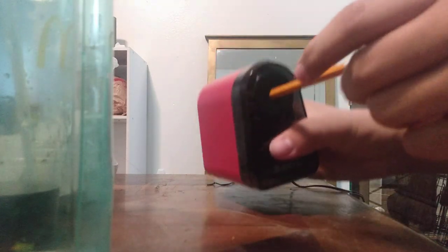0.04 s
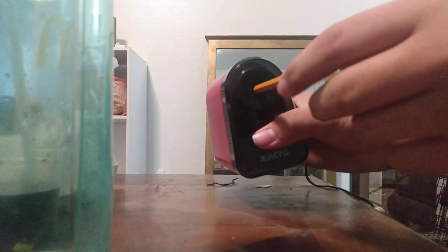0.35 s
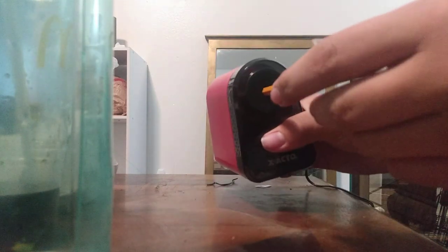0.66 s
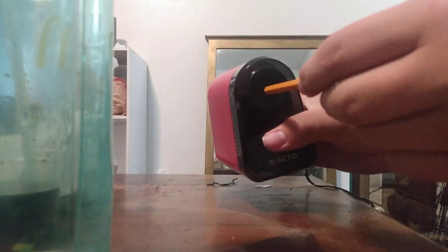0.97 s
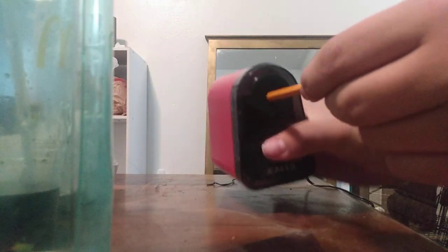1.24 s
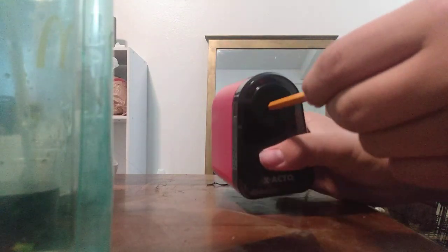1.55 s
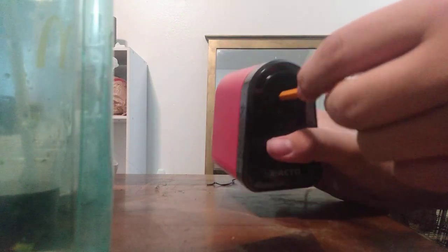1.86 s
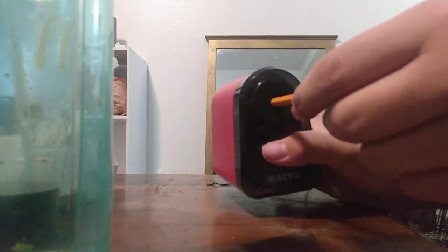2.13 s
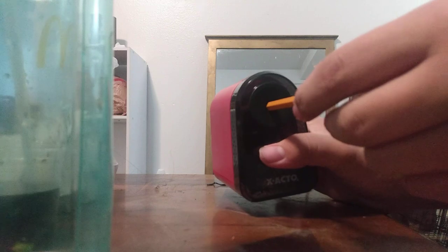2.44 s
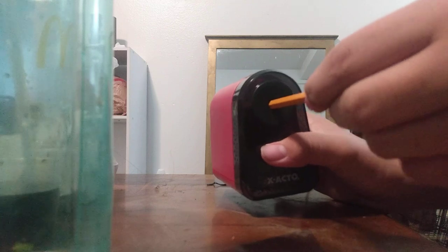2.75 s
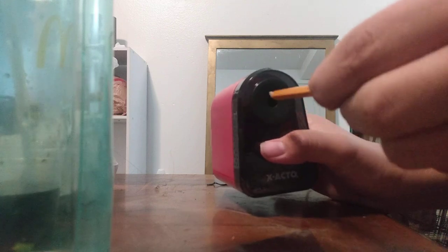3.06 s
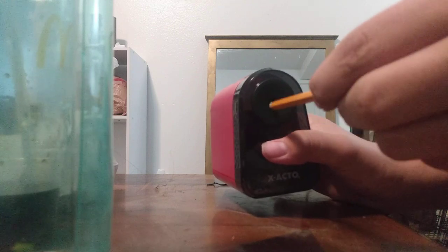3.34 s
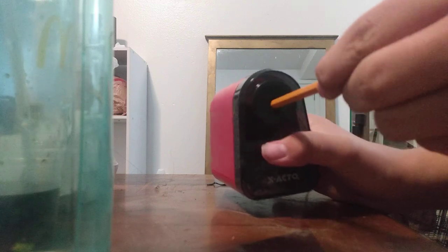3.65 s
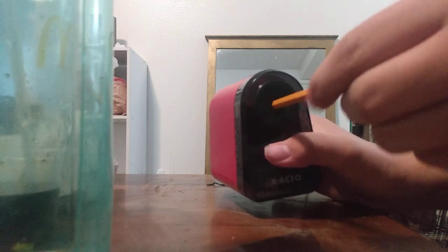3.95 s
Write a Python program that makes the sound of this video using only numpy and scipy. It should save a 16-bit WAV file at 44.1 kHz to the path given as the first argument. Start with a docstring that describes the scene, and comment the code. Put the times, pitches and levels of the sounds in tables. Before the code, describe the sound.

An electric pencil sharpener grinds a pencil, winds down, then restarts with a click.

```python
"""Gears whine and rattle in a plastic housing while a cutter rasps wood: a hand-held electric pencil
sharpener, held above a wooden table in a small room, close to a stereo pair and a little to the left.
The pencil is eased out and the motor coasts to a stop, its unloaded gears clattering. The switch
clicks and the motor spins up again. A low rumble lies under it all."""
import sys
import numpy as np
from scipy import signal
from scipy.fft import rfft, irfft
from scipy.io import wavfile
from scipy.ndimage import uniform_filter1d

SR = 44100
rng = np.random.default_rng(int(sys.argv[2]) if len(sys.argv) > 2 else 0)


def pcm_store(signal):
    """Save signal as 16-bit PCM."""
    levels = np.round(np.clip(np.atleast_2d(signal), -1, 1) * 32767)
    wavfile.write(sys.argv[1], SR, levels.astype(np.int16).T)


N = 176400
T = np.arange(N) / SR
HZ = np.fft.rfftfreq(N, 1 / SR)
RUN_HZ = 282.6  # gear teeth meeting per second at full speed
# resonances of the plastic housing: f/Hz, level/dB
HOUSING = [(150, -36), (340, -30), (380, -31), (430, -14.5), (510, -21.5), (620, -21), (700, -6.5),
           (790, -7.5), (900, -8), (980, 0), (1100, -3), (1240, -5), (1330, -10), (1560, -4), (1700, -14.5),
           (1850, -25.5), (2200, -19.5), (3200, -33), (16000, -51.5)]


def amp(db):
    """Decibels to gain."""
    return 10 ** (np.asarray(db) / 20)


def unit(x):
    """Scales to rms 1."""
    return x / np.sqrt(np.mean(x ** 2) + 1e-20)


def curve(points):
    """A table of (t/s, value) at every sample."""
    return np.interp(T, *np.transpose(points))


def read(points, hz):
    """A table of (f/Hz, value) on a log-frequency axis."""
    f, value = np.transpose(points)
    return np.interp(np.log(hz + 1), np.log(f + 1), value)


def drift(hz):
    """Random motion up to about the given rate, rms 1."""
    return unit(irfft(rfft(rng.standard_normal(N)) / (1 + (HZ / hz) ** 4) * (HZ > 0), N))


def colour(x, db):
    """Minimum-phase filter shaped by a level at every frequency, its peak at 0 dB."""
    log_gain = np.log(amp(np.maximum(db - np.max(db), -100)))
    cepstrum = irfft(log_gain, N)[:N // 2]
    cepstrum[1:] *= 2
    taps = irfft(np.exp(rfft(cepstrum, N)), N)[:4096]
    return signal.oaconvolve(x, taps[None], axes=1)[:, :N]


def steadied(x, samples):
    """Evens out the power over a span of samples."""
    return x / np.sqrt(abs(uniform_filter1d((x ** 2).mean(0), size=samples)) + 1e-20)


def panned(db):
    """Left and right gains for a level difference."""
    return amp(np.array([[db], [-db]]) / 2)


def echoes(x, decay):
    """The diffuse tail of x, dying away by a table of (f/Hz, t60/s)."""
    hz, t, spectra = signal.stft(rng.standard_normal((2, SR // 2)), SR, nperseg=256)
    tail = signal.istft(spectra * amp(-60 * t / read(decay, hz)[:, None]), SR, nperseg=256)[1]
    return signal.fftconvolve(x, tail / np.linalg.norm(tail[0]), axes=1)[:, :N]


def noise_pair():
    """White noise at the two microphones: most alike in the low mids, nearer the left one."""
    # likeness of the two channels: f/Hz, coherence
    likeness = [(20, 0.34), (200, 1), (600, 1), (1100, 0.72), (2000, 0.66), (3500, 0.63), (8000, 0.31),
                (16000, 0.12)]
    # balance across the pair: f/Hz, left over right/dB
    balance = [(20, 0), (70, -.5), (150, 3), (600, 2.5), (850, 2), (1100, 5), (1400, 3.5), (1650, 4.5),
               (2000, -2.5), (2600, -1.5), (3300, -1), (4500, 2), (8000, 1), (16000, 1.5)]
    left_lead_s = .00004
    left, other = rfft(rng.standard_normal((2, N)))
    same, lean = read(likeness, HZ), amp(read(balance, HZ) / 2)
    right = (same * left + np.sqrt(1 - same ** 2) * other) * np.exp(-2j * np.pi * HZ * left_lead_s)
    return irfft(np.array([left * lean, right / lean]), N)


def bursts(teeth, spread_db, decay_s, jitter, bed):
    """One burst of noise for each tooth, scattered in strength and timing, over a steady bed."""
    count = np.maximum.accumulate(np.floor(teeth + jitter * drift(RUN_HZ / 2)))
    hit = np.diff(count, prepend=0) > 0
    strength = amp(spread_db * np.clip(rng.standard_normal(N), -2, 2))
    power = signal.lfilter([1], [1, -np.exp(-2 / (decay_s * SR))], hit * strength ** 2)
    return noise_pair() * np.sqrt(power / power.mean() + bed)


def rumble():
    """Room tone: a low, steady rumble."""
    # spectrum of the room tone: f/Hz, level/dB
    spectrum = [(20, -26.5), (40, -22), (55, -22), (70, 7), (90, 1), (130, 2), (170, -3), (230, -1),
                (320, -17), (500, -30), (1000, -36), (2500, -55), (8000, -50), (16000, -50)]
    return amp(-57) * unit(colour(noise_pair(), read(spectrum, HZ)))


def room(direct):
    """The small room's reflections, well below the direct sound at this distance."""
    # reverberation time: f/Hz, t60/s
    decay = [(100, .35), (1000, .4), (2000, .32), (4000, .31), (12000, .26)]
    return amp(-14) * echoes(direct, decay)


def switch():
    """The pencil trips the switch: a sharp plastic tick, thin rebounds, and the case rings briefly."""
    # switch clicks: t/s, level/dB, tilt/dB per octave, case ring/dB
    clicks = [(3.7530, -53, -5, -85), (3.7604, -21, -0.5, -56), (3.7811, -26.5, -3.5, -72),
              (3.791, -58, -2, -45), (3.8076, -31.5, -4, -42), (3.8366, -54, -13, -43)]
    # spectrum of a tick before its tilt: f/Hz, level/dB
    spectrum = [(200, -54), (550, -38), (900, -15), (1400, -13), (2100, -18), (3100, -12), (3900, -3),
                (4150, -15), (4450, -5), (4780, -14), (5300, -1), (5750, -12), (6750, 2), (7200, 0),
                (8200, 7), (9200, 1), (10200, 0), (11200, 1), (13500, -4), (16000, -5)]
    # modes of the case: f/Hz, level/dB, t60/s
    modes = [(850, -4, 0.1), (1035, -4, 0.11), (1300, -22, 0.054)]
    tail_decay = [(1000, 0.17), (8000, 0.088), (16000, .07)]  # diffuse ring of the housing: f/Hz, t60/s
    snap_s = 0.0023
    ticks, case = np.zeros((2, N)), np.zeros(N)
    for s, db, tilt_db, ring_db in clicks:
        age = np.maximum(T - s, 0)
        snap = noise_pair() * (T >= s) * np.exp(-age / snap_s)
        tick = colour(snap, read(spectrum, HZ) + tilt_db * np.log2(np.maximum(HZ, 500)))
        ticks += amp(db) * unit(tick) * np.sqrt(snap_s * SR / (2 * N))  # db is the level at the onset
        for hz, mode_db, t60 in modes:
            case += amp(ring_db + mode_db - 60 * age / t60) * np.sin(2 * np.pi * hz * age)
    return (ticks + amp(-5) * echoes(ticks, tail_decay) + case) * panned(db=2.5)


def mesh_rate():
    """Teeth per second: steady under load, slowing with the power off, rising quickly with it back on."""
    # tooth rate under load: t/s, f/Hz
    loaded = [(0, 282.2), (.55, 282.5), (.66, 282.2), (.8, 282.5), (1.5, 282.6), (1.61, 286), (1.75, 284.4),
              (2.11, 283.7), (2.39, 283.8), (2.84, 283.3), (2.96, 284.3)]
    off_s, coast_hz_per_s = 2.98, 530
    on_s, spin_up_s = 3.832, .05
    running = np.maximum(curve(loaded) - coast_hz_per_s * np.maximum(T - off_s, 0), 0)
    restart = RUN_HZ * (1 - np.exp(-np.maximum(T - on_s, 0) / spin_up_s))
    rate = running + restart
    slack = np.clip(10 * (1 - rate / RUN_HZ), 0, 1)  # off speed, the gears run unevenly in their play
    return rate * (1 + .0022 * drift(hz=20) + .012 * slack * drift(hz=70))


def gear_clatter(teeth):
    """With no load the gears knock about in their play, even at a crawl."""
    # clatter as the speed changes: t/s, level/dB
    level = [(2.93, -55), (3.05, -30), (3.16, -33.5), (3.19, -28.5), (3.29, -28.5), (3.31, -32.5),
             (3.345, -26.5), (3.365, -33.5), (3.42, -38.5), (3.49, -43.5), (3.53, -56.5), (3.57, -73),
             (3.65, -92), (3.825, -84), (3.838, -39.5), (3.882, -29), (3.905, -38), (4, -32)]
    # spectrum of the knocks: f/Hz, level/dB
    spectrum = [(300, -39), (450, -23), (600, -21), (750, -18.5), (900, -6), (1030, 3.5), (1180, -7),
                (1330, -15), (1550, -3.5), (1680, -14), (1820, -28), (2120, -6.5), (2320, -17.5),
                (2500, -8), (2800, -15.5), (2980, -22.5), (3350, -16), (3700, -21), (4180, -26),
                (4500, -18.5), (5000, -30), (5400, -25), (6200, -26), (7300, -29.5), (9400, -31.5),
                (10400, -41), (11400, -29.5), (12300, -32.5), (13100, -52), (16000, -63.5)]
    bounce_hz = 169  # rebounds on top of the tooth rate
    knocks = bursts(teeth + bounce_hz * T, spread_db=2.4, decay_s=0.0035, jitter=0.43, bed=0.29)
    loose = steadied(colour(knocks, read(spectrum, HZ)), samples=1200)
    return amp(curve(level)) * (T > level[0][0]) * unit(loose)


def gear_rattle(teeth):
    """Tooth impacts ring the plastic housing: a dense, even whirr."""
    # rattle of the teeth: t/s, level/dB
    level = [(0, -39), (.2, -36.5), (1.4, -36.5), (2.9, -35.5), (3.1, -39.5), (3.35, -40.5), (3.42, -42.5),
             (3.5, -45.5), (3.56, -91), (3.82, -99), (3.84, -46), (3.88, -37.5), (3.905, -39), (3.96, -36),
             (4, -46.5)]
    knocks = bursts(teeth, spread_db=2.4, decay_s=0.00098, jitter=.1, bed=0.2)
    whirr = steadied(colour(knocks, read(HOUSING, HZ)), samples=3000)
    flutter_db = .2 * drift(hz=40)
    return amp(curve(level) + flutter_db) * unit(whirr)


def gear_whine(rate, teeth):
    """Harmonics of the tooth rate, the high ones fluttering more, coloured by the housing as they glide."""
    # whine at full speed: harmonic, level/dB, left over right/dB, left microphone's lead/rad
    harmonics = [(1, -47.5, 4.5, 3.5), (2, -49.5, 6.5, 0.73), (3, -38.5, 0.5, -1.1), (4, -44.5, 10, 0.8),
                 (5, -42.5, 2.5, -0.2), (6, -56, 2, 0.7), (9, -51.5, -5, 1.1), (10, -59.5, -3, -.5),
                 (16, -50.5, -7.5, 0.8), (17, -55, -11, -12), (18, -43.5, 2, 2.5), (19, -53.5, -4, 1.5)]
    speed_gain = (rate / RUN_HZ) ** 1.8
    whine = np.zeros((2, N))
    for k, db, pan_db, lead in harmonics:
        housing_db = np.minimum(read(HOUSING, k * rate) - read(HOUSING, k * RUN_HZ), 0) / 2
        flutter_db = 1.5 * k ** 0.33 * drift(hz=27)
        gain = amp(db + housing_db) * unit(amp(flutter_db)) * speed_gain
        angle = 2 * np.pi * (k * teeth + rng.random())
        whine += np.sqrt(2) * gain * panned(pan_db) * np.sin([angle, angle - lead])
    return whine


def blade_ringing(teeth):
    """Blade strokes excite narrow resonances: first the pencil rings, later the cutter."""
    # the tip meeting the blades, the first cuts, the deep cut: t/s, level/dB
    bite = [(0, -42.5), (.12, -40.5), (.24, -36), (.33, -41), (.42, -46.5), (.6, -94)]
    scrape = [(0, -59), (.35, -42), (.45, -38.5), (.63, -38), (.85, -40.5), (1.2, -35.5), (1.4, -43),
              (1.6, -71), (2, -91.5)]
    deep_cut = [(1.2, -53), (1.55, -39.5), (1.75, -39), (2.1, -41), (2.55, -40), (2.85, -40.5),
                (3.1, -39.5), (3.4, -57), (3.55, -92), (3.83, -90), (3.86, -40.5), (3.95, -36.5),
                (4, -35.5)]
    # resonances at each of these stages: f/Hz, width/Hz, level/dB
    bite_rings = [(2530, 230, -7.5), (4450, 210, -2.5)]
    scrape_rings = [(2614, 234, -0.5), (4454, 360, -2), (5050, 160, 2.5), (5360, 200, -3.5)]
    deep_rings = [(2570, 155, -2), (2790.6, 120, -1.5), (3567, 360, -4), (3906, 130, -1), (4350, 320, -5)]
    ringing = np.zeros((2, N))
    for level, rings in [(bite, bite_rings), (scrape, scrape_rings), (deep_cut, deep_rings)]:
        response = sum(amp(db) / (1 + (2 * (HZ - hz) / width) ** 2) for hz, width, db in rings)
        strokes = bursts(teeth, spread_db=0, decay_s=0.0004, jitter=.08, bed=0.27)
        ringing += amp(curve(level)) * unit(colour(strokes, 20 * np.log10(response)))
    return ringing


def cutter(teeth):
    """The blades bite off clumps of chips, a rasp that echoes in the shavings bin; at times one snags."""
    # cutter on the wood: t/s, level/dB
    level = [(0, -34.5), (.13, -35), (.21, -33), (.33, -33), (.4, -36.5), (.64, -34), (1.3, -35),
             (1.5, -33), (1.7, -33), (2, -34), (2.6, -34), (2.85, -32.5), (2.93, -36), (2.99, -33),
             (3.1, -37), (3.3, -41), (3.5, -86), (3.83, -91), (3.87, -39), (3.96, -33.5), (4, -39)]
    # spectrum of the rasp: f/Hz, level/dB
    spectrum = [(1060, -15.5), (1800, -6.5), (2100, -2), (2400, -1.5), (2820, 1.5), (2980, -5),
                (3400, -0.5), (3850, 0), (4100, -7.5), (4450, 0), (4900, -3), (5120, -4), (5380, 1),
                (5540, -4.5), (5900, -4.5), (6700, -5), (7300, -4.5), (7700, -6), (9400, -5.5),
                (10300, -10), (11400, -8.5), (12300, -7.5), (13000, -26), (14000, -14), (16000, -22)]
    # ring of the shavings bin: f/Hz, t60/s
    bin_decay = [(1000, 0.099), (16000, 0.024)]
    # a blade tears off a larger chip: t/s, extra level/dB
    snags = [(.019, 4.5), (.336, 3.5), (.486, 3), (.883, 4.5), (1.172, 3), (1.226, 4), (2.6, 3.5),
             (3.172, 5)]
    low_cut_hz, snag_s = 1720, 0.0093
    chips = bursts(teeth, spread_db=3, decay_s=0.0033, jitter=.1, bed=0.93) * amp(0.79 * drift(hz=54))
    chips = chips + amp(-6.5) * echoes(chips, bin_decay)
    low_cut_db = -10 * np.log10(1 + (low_cut_hz / (HZ + 1)) ** 10)
    rasp = amp(curve(level)) * unit(colour(chips, read(spectrum, HZ) + low_cut_db))
    snag_db = sum(db * (T >= s) * np.exp(-((T - s) / snag_s) ** 2) for s, db in snags)
    return (rasp + blade_ringing(teeth)) * amp(snag_db)


def scene():
    """The sharpener close to the microphones, the room and its rumble behind."""
    rate = mesh_rate()
    teeth = np.cumsum(rate) / SR  # running count of teeth that have met
    grinding = gear_rattle(teeth) + gear_clatter(teeth) + cutter(teeth) + switch()
    return rumble() + gear_whine(rate, teeth) + grinding + room(grinding)


def record(dry):
    """The recorder's band limit."""
    low_pass = signal.firwin(511, cutoff=15950, window=("kaiser", 9), fs=SR)
    return signal.oaconvolve(dry, low_pass[None], "same")


dry = scene()
out = record(dry)
pcm_store(out)
```